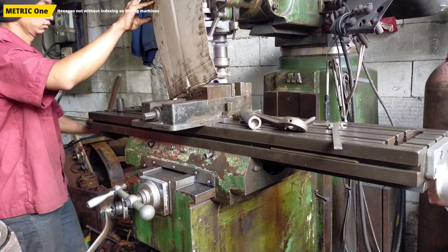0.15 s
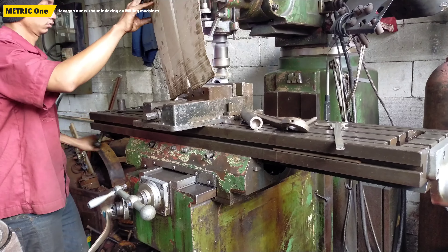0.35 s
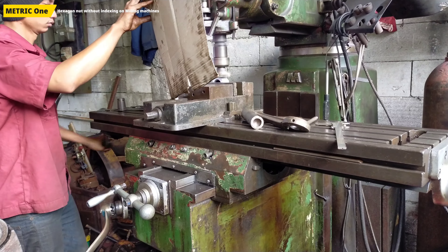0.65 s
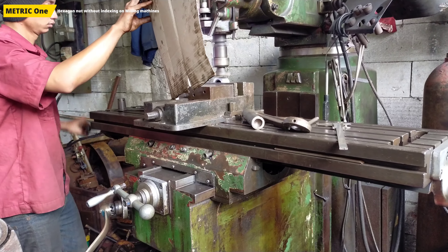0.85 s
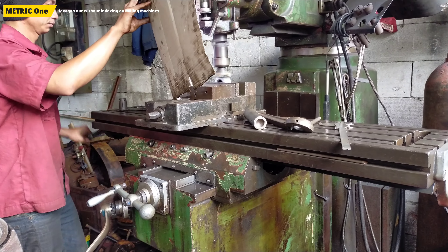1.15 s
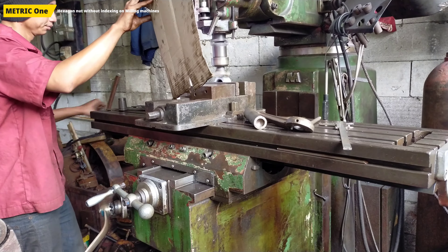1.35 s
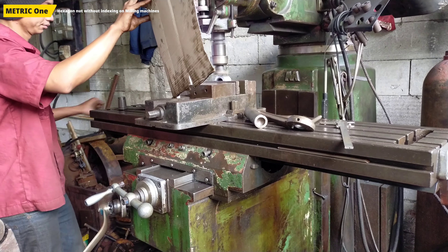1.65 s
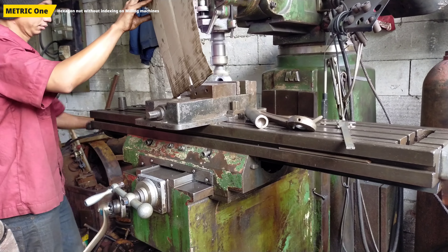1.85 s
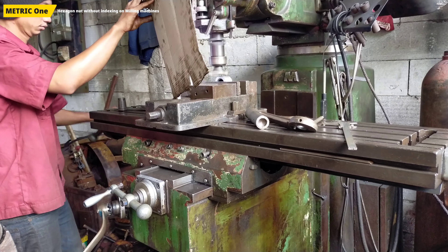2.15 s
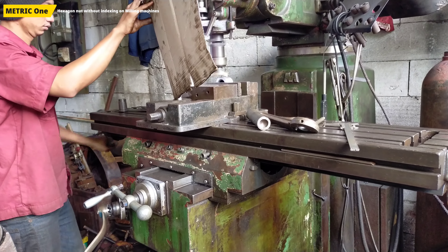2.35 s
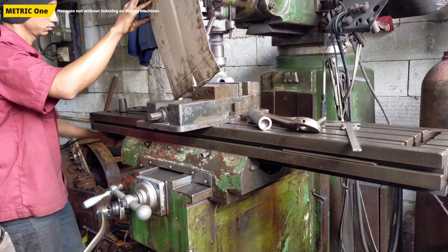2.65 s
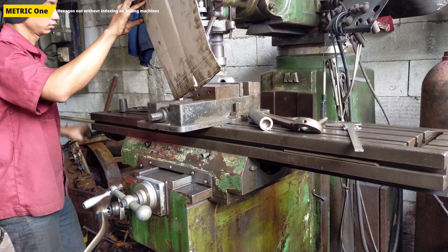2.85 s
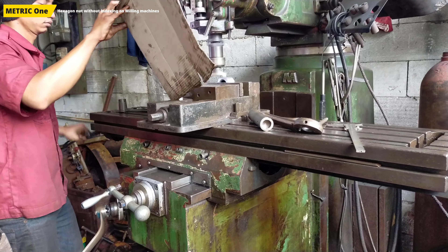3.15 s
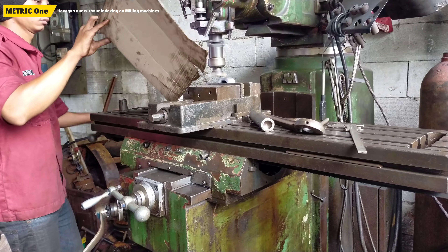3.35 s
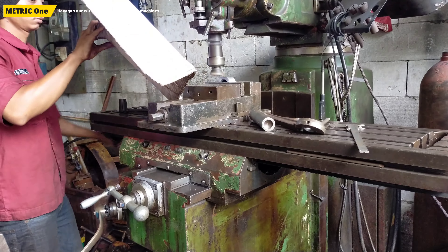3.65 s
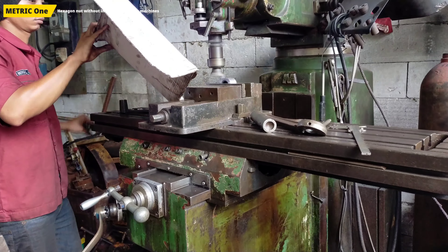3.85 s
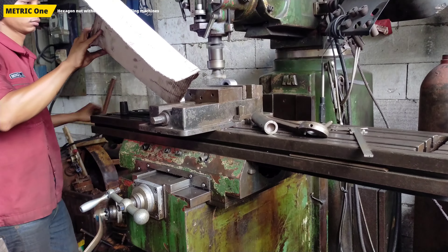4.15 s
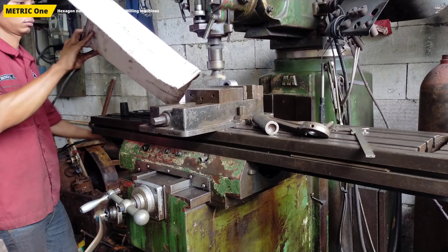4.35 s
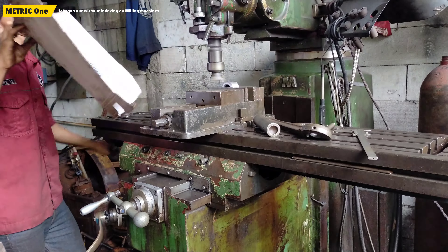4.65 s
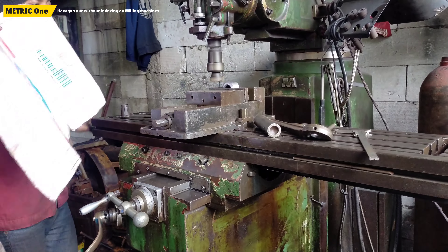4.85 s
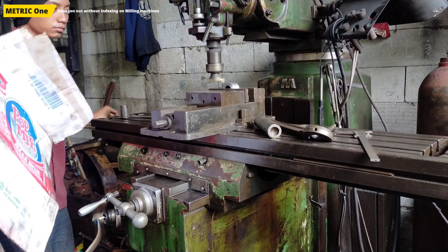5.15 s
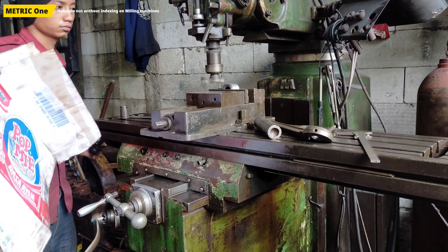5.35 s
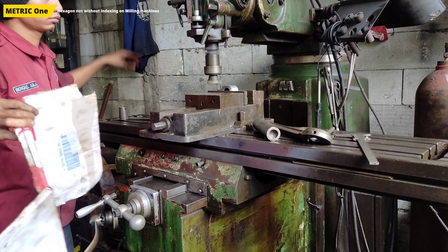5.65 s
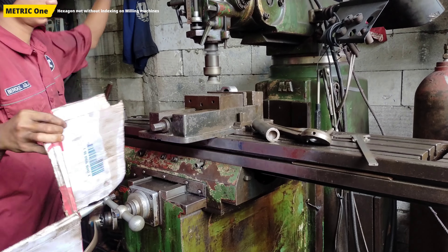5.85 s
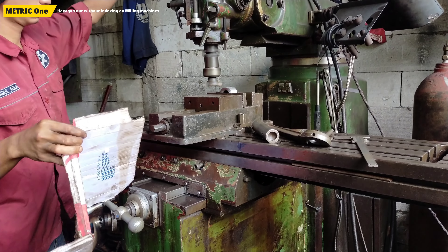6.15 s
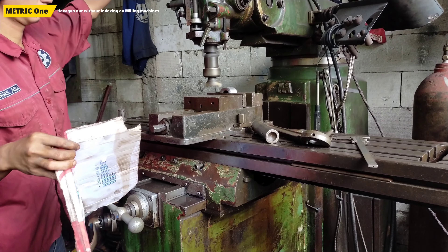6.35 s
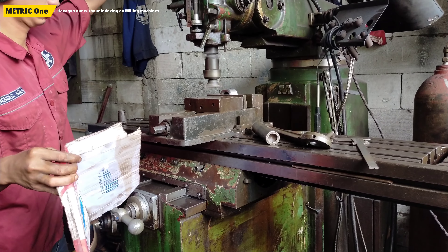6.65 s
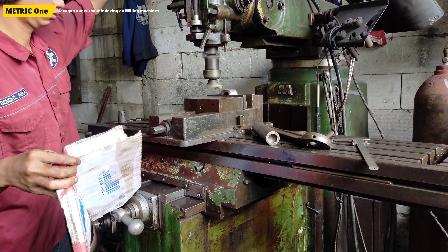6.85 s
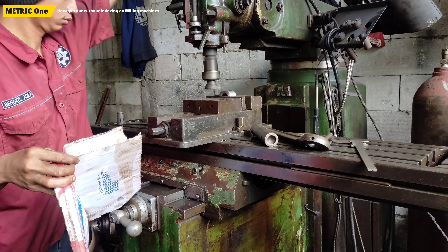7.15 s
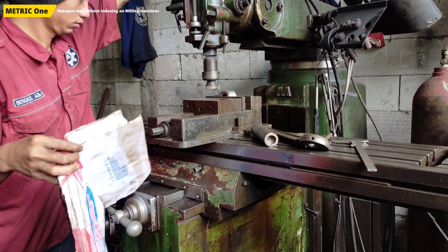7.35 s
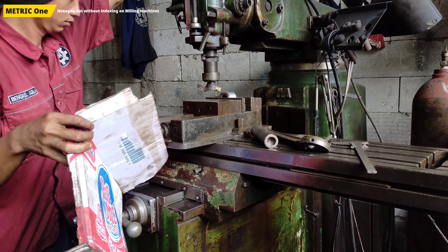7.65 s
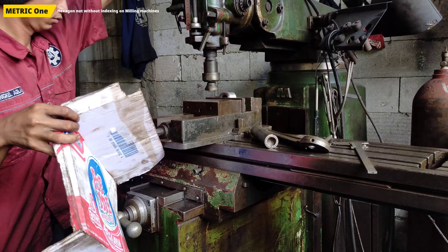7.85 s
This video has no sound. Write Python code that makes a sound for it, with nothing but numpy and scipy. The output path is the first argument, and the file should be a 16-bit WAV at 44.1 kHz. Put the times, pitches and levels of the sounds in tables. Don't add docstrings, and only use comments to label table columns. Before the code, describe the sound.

A milling machine cuts metal in a concrete workshop, close and essentially mono. A scrap of its noise stops almost at once; after silence until about 0.1 s, it fades in over a quarter second from a new spot. Gear hum around 340 Hz swells and cancels over a dense bearing roar, with a steadier whistle near 1.7 kHz. A fluttering motor whine near 6 kHz dips slightly around 1.9 s. Bright chip hiss carries fast tooth chatter, while short metallic rings flicker and slide. A thin squeal near 9.4 kHz creeps in after 2.3 s, peaks at 3.7-4.1 s, sings again at 4.5 s and vanishes by 5.4 s. The motor sags from 4.2 s, lowest and faintest near 5.8 s, then recovers towards 7.8 s. Gain ducks repeatedly, with abrupt dips near 2.9, 4, 5.8 and 7.3 s. Cutting continues to the end.

```python
import sys
import numpy as np
from scipy import signal
from scipy.io import wavfile
from scipy.ndimage import uniform_filter1d, map_coordinates

SR = 44100
rng = np.random.default_rng(int(sys.argv[2]) if len(sys.argv) > 2 else 0)


def level_to_linear(level):
    exponent = np.asarray(level, float) / 20
    return 10 ** exponent


def digitize_waveform(pressure):
    field = np.atleast_2d(pressure).T
    bounded = np.clip(field, -1, 1)
    quanta = np.round(bounded * 32767).astype(np.int16)
    wavfile.write(sys.argv[1], SR, quanta)


N = 352800
T = np.arange(N) / SR
CUT_S, BACK_S, FADE_S = .0345, .1065, .26


def rms_one(x):
    return x / np.sqrt(np.mean(x ** 2) + 1e-20)


def in_time(rows):
    s, *columns = np.transpose(rows)
    return [np.interp(T, s, c) for c in columns]


def bumps(rows, fall_s=None):
    t, out = T[::40], 0
    for s, half, db in rows:
        u = np.where(t < s, (s - t) / (fall_s or half), (t - s) / half)
        out = out + db * np.cos(np.pi / 2 * np.minimum(u, 1)) ** 2
    return np.interp(T, t, out)


def drift(rate):
    r = np.exp(-80 * np.pi * rate / SR)
    noise = rng.standard_normal(N // 40 + 2002)
    slow = signal.lfilter([1], [1, -2 * r, r * r], noise)[2000:]
    return np.interp(T, np.arange(len(slow)) * 40 / SR, rms_one(slow))


def band(x, low_hz, high_hz, order=2):
    return signal.sosfilt(signal.butter(order, [low_hz, high_hz], "band", fs=SR, output="sos"), x)


def coloured(sources, spectrum, patchy_db, rate):
    hz, db = np.transpose(spectrum)
    edges = np.geomspace(hz[0], hz[-1], round(3 * np.log2(hz[-1] / hz[0])))
    out = 0
    for k, (low, high) in enumerate(zip(edges, edges[1:])):
        level_db = np.interp(np.log(low * high) / 2, np.log(hz), db)
        out = out + level_to_linear(level_db + patchy_db * drift(rate)) * band(sources[k % 2], low, high)
    return rms_one(out)


def tone(hz, db, wobble_hz, flutter_db):
    phase = 2 * np.pi * np.cumsum(hz + wobble_hz * drift(28.7)) / SR
    return np.sqrt(2) * level_to_linear(db + flutter_db * drift(26)) * np.sin(phase)


# (time [s], loudness [dB], chip hiss against it [dB])
LOAD = [(.35, -27, -8), (.85, -23.5, -11), (1.2, -27, -7.5), (1.45, -26.5, -9.5), (1.8, -24.5, -8.5),
        (2.3, -24.5, -9), (2.85, -25.5, -8.5), (3.1, -28, -7.5), (3.5, -24.5, -11), (3.95, -24.5, -9.5),
        (4.3, -26, -8), (5.1, -27, -10), (5.7, -30, -7.5), (6.4, -28, -7.5), (6.85, -29.5, -8),
        (7.25, -27, -10.5), (7.8, -25, -8.5), (8, -27.5, -6.5)]
# (deepest time [s], recovery [s], level [dB])
DUCKS = [(.59, 0.046, -2), (.77, 0.1, -2), (.94, 0.25, -2), (1.93, 0.14, -2), (2.2, 0.18, -2),
         (2.75, 0.071, -2.5), (2.84, .05, 1), (3.0, 0.14, 2), (3.33, .06, -2.5), (3.99, 0.44, -1.5),
         (4.22, 0.23, -1), (4.58, 0.039, -1.5), (4.77, .08, -2), (5.25, 0.069, -2), (5.5, 0.059, -2),
         (5.57, 0.038, -3), (5.6, 0.068, 1.5), (5.79, .03, -0.5), (5.9, 0.066, 0.5), (5.975, .04, 0),
         (6.03, 0.11, -2.5), (6.18, 0.1, -2.5), (6.33, 0.13, -2.5), (6.49, 0.12, -3.5), (6.68, 0.09, -1),
         (6.96, 0.14, -1.5), (7.6, .1, -0.5), (7.98, 0.092, -1.5)]
# (time [s], length [s], level [dB])
DROPS = [
    (2.906, 0.16, -3.5),
    (3.968, 0.094, -3),
    (5.838, 0.095, -3),
    (7.31, 0.12, -5),
    (7.945, .1, -1.5),
]


def loudness_db():
    step_s, steps_db = .01, 0
    for s, length, db in DROPS:
        inside_s = np.minimum(T - s, s + length - T)
        steps_db = steps_db + db * np.clip(inside_s / step_s + .5, 0, 1)
    return in_time(LOAD)[0] + bumps(DUCKS, fall_s=0.069) + steps_db


# (frequency [Hz], density [dB per Hz])
BODY = [(15, -54), (25, -10), (139, -19), (232, -3), (335, 1.5), (536, -3.5), (637, -4.5), (724, -1),
        (1350, 1), (1500, -2.5), (1670, 7), (1820, 3), (2110, 2.5), (4200, -18.5), (5460, -77),
        (9240, -120)]
# (frequency [Hz], width [Hz], level [dB])
CASTING = [(97, 20, -52.5), (173, 34, -49), (243.3, 22, -39.5), (629, 38, -39), (802.7, 16, -44.5),
           (858.4, 16, -45.5), (1008, 16, -49.5), (1339, 27, -40.5), (1670, 51, -42), (2030, 47, -57),
           (2077, 17, -43), (2134, 26, -41.5), (2283, 77, -40), (2417, 28, -43)]


def roar():
    sound = coloured(rng.standard_normal((2, N)), BODY, patchy_db=0.5, rate=3.6)
    for hz, width, db in CASTING:
        r = np.exp(-np.pi * width / SR)
        poles = [1, -2 * r * np.cos(2 * np.pi * hz / SR), r * r]
        rung = signal.lfilter([1, 0, -1], poles, rng.standard_normal(N))
        sound += level_to_linear(db + 28 + 1.12 * drift(0.97)) * rms_one(rung)
    rumble_db = -3.5 * np.clip(T - 4.2, 0, 1)
    sound += (level_to_linear(rumble_db) - 1) * band(sound, 126, 224)
    return level_to_linear(loudness_db() - 4.0) * sound


# (time [s], half length [s], level [dB])
BEATS = [(.2, 0.3, -6), (.5, .12, -5), (.84, 0.18, 3), (1.14, 0.12, 2.5), (2.02, 0.12, -13),
         (2.14, 0.083, 4), (2.37, 0.14, -6), (2.54, 0.23, 4.5), (2.85, 0.16, -6), (3.23, .1, -10),
         (3.74, 0.13, 5), (4.05, .2, -1), (4.6, 0.086, -2), (5.2, .1, 3), (5.35, .08, 1),
         (5.52, 0.19, -5.5), (5.68, .08, 3), (5.8, 0.14, -18), (6.1, 0.43, -2.5), (6.47, .06, -11),
         (6.61, 0.1, -20), (6.9, .12, 2), (7.24, 0.27, 4.5), (7.65, 0.25, 3), (7.87, 0.085, 7)]
# (time [s], half length [s], level [dB])
WHISTLE = [(1.1, .2, 1.5), (1.92, .1, -5), (2.3, 0.083, 2), (2.6, 0.18, 2.5), (2.98, 0.14, 1.5),
           (3.2, 0.53, 1.5), (3.8, 0.6, -4), (4.49, 0.13, 2), (4.93, 0.069, 0), (5.68, .12, 2),
           (6.02, 0.15, 4), (6.35, .1, 0), (6.47, .08, -5), (6.68, .12, 1), (6.85, 0.08, -11),
           (7.13, .08, -5), (7.47, .08, 2.5), (7.6, 0.084, -9)]


def gears():
    mesh_hz = 340.2
    loud = loudness_db()
    first_db = loud - 13 + bumps(BEATS)
    fifth_db = loud + 0.17 * (loud - loud.mean())
    fifth_db = fifth_db - 9.5 - 0.36 * T + bumps(WHISTLE)
    fifth_db = fifth_db - 7 * (T < BACK_S)
    return (tone(mesh_hz, first_db, wobble_hz=.4, flutter_db=1.6)
            + tone(5 * mesh_hz, fifth_db + .5, wobble_hz=.5, flutter_db=.8)
            + tone(4 * mesh_hz, fifth_db - 13.0, wobble_hz=2.63, flutter_db=5.5)
            + tone(3 * mesh_hz, fifth_db - 20, wobble_hz=3, flutter_db=4.0))


# (time [s], slot whine [Hz])
SPEED = [(0.3, 6174), (1.1, 6222), (1.5, 6190), (1.87, 5965), (2.15, 6090), (2.5, 6160), (3.2, 6215),
         (3.85, 6225), (4.2, 6095), (5.4, 5365), (5.85, 5225), (6.4, 5295), (6.7, 5390), (7.3, 5860),
         (7.8, 6072), (7.95, 6080)]
# (time [s], half length [s], level [dB])
BREAKS = [(.35, .15, 1), (.6, .06, 6), (.72, .06, -12), (.92, .17, -2), (1.3, .2, 6.5), (1.5, 0.055, -10),
          (1.85, .13, -2), (2.1, .07, 5), (2.3, .37, 4), (2.95, .16, -4), (3.15, .12, 8), (3.39, .089, -12),
          (3.55, .08, 2), (3.72, .22, 7.5), (4.0, .08, 3), (4.35, .15, 1), (4.6, .07, -3), (5, .08, -5),
          (5.45, .12, -4), (5.85, .15, -9), (6.05, .15, -7), (6.5, .1, -4), (6.72, .08, -3), (6.85, .1, -2),
          (7.2, .1, 2), (7.65, 0.28, 5), (8, .15, -4)]
# (time [s], half length [s], level [dB])
OCTAVE_SINGS = [(.2, .1, 4), (.72, .15, 9), (1, .25, 6), (1.5, .1, 10), (1.75, .25, 5), (2.3, .2, 1),
                (2.95, .1, 3), (1.95, .08, 4), (2.75, .12, 7), (3.2, .2, 3), (3.45, .15, 6), (7.2, .2, 7),
                (7.6, .15, 3), (7.9, .15, 4)]


def motor():
    hz = uniform_filter1d(in_time(SPEED)[0], size=SR // 6)
    slowed_khz = (hz.max() - hz) / 1000
    breaks_db = bumps(BREAKS)
    whine_db = hiss_level_db() - 13.5 - 6.5 * slowed_khz + breaks_db
    octave_db = whine_db - 9.5 + .2 * breaks_db + bumps(OCTAVE_SINGS) + 3 + drift(2)
    octave_db = octave_db - np.maximum(5700 - hz, 0) / 40
    stutter_db = (2 + 3 * slowed_khz) * np.minimum(drift(22), .6)
    return (tone(hz, whine_db + .5 + stutter_db, wobble_hz=9, flutter_db=2.5)
            + tone(2 * hz, octave_db, wobble_hz=7, flutter_db=2.5))


# (time [s], level against the loudness [dB])
SQUEAL = [
    (2.3, -27.5),
    (3.3, -16.5),
    (3.55, -23),
    (3.75, -9),
    (4.1, -9),
    (4.25, -14.5),
    (4.5, -9.5),
    (4.66, -16.5),
    (5.1, -24.5),
    (5.401, -23),
]


def squeal():
    db = in_time(SQUEAL)[0]
    hz = 9412 + 2.5 * np.minimum(db.max() - db, 14)
    effort_db = in_time(LOAD)[0]
    db = db + effort_db + 1.5 * (loudness_db() - effort_db)
    on = np.clip(np.minimum(T - SQUEAL[0][0], SQUEAL[-1][0] - T) / 0.41, 0, 1)
    halo = level_to_linear(db - 8) * rms_one(band(rng.standard_normal(N), 9290, 9540))
    return on * (tone(hz, db, wobble_hz=10.5, flutter_db=2.0) + halo)


# (frequency [Hz], density [dB per Hz])
AIR = [(2700, -17), (3200, -10.5), (3950, -10), (5080, -7.5), (6300, -5.5), (6900, -5.5), (8050, -4.5),
       (9500, -0.5), (12000, -6), (13800, 14), (14600, 0), (15400, 1), (17500, -13)]
# (time [s], repeats [per s])
CHATTER = [(0, 136), (1.75, 138), (2.4, 132), (2.9, 132.5), (3.1, 134.5), (4.4, 134), (5.6, 145),
           (5.8, 145), (6.0, 138), (6.4, 137), (8, 139)]
# (time [s], half length [s], level [dB])
LOCKS = [(.25, .3, 3), (.85, .25, 6), (1.7, .4, 6), (2.6, .3, 7), (3.35, .5, 6.5), (4.1, .6, 4),
         (5.65, .45, 5), (6.4, .4, 6), (8, .5, 3)]
# (time [s], half length [s], level [dB])
HOLDER = [(.95, 0.23, 2), (1.75, 0.36, 5), (3.5, .8, 0.5), (4.8, 1, 5), (5.7, 0.65, 2), (6.45, 0.98, 5),
          (7.85, .2, 3)]
# (time [s], half length [s], level [dB])
DULLS = [
    (2.4, .6, -3),
    (5.4, .3, 0),
    (7.35, 0.78, -3.5),
]


def hiss():
    per_s, repeat_db = in_time(CHATTER)[0], -9 + bumps(LOCKS)
    passes = np.cumsum(per_s + .2 * drift(4)) / SR
    pattern = rng.standard_normal((2, 106, 400))
    place = [T * 13, passes % 1 * 399]
    looped = np.array([rms_one(map_coordinates(p, place, order=1)) for p in pattern])
    looped = band(looped, 8200, 11400, order=1) + .5 * band(looped, 6800, 14500, order=3)
    source = rng.standard_normal((2, N)) + looped * level_to_linear(repeat_db + 2)
    source = source / np.sqrt(1 + .6 * level_to_linear(2 * repeat_db))
    sound = coloured(source, AIR, patchy_db=0.7, rate=6.0)
    holder_db = bumps(HOLDER)
    ring = (level_to_linear(holder_db) - 1) * band(sound, 6600, 8180, order=2)
    top_air = (level_to_linear(0.44 * holder_db) - 1) * band(sound, 14200, 17000, order=1)
    sound += ring + top_air
    sound += (level_to_linear(-0.35 * holder_db + bumps(DULLS)) - 1) * band(sound, 12100, 14300, order=1)
    sound += (level_to_linear(2) - 1) * band(sound, 14500, 17000, order=2)
    return level_to_linear(hiss_level_db() + 4.0 + 0.24 * drift(27)) * sound


# (time [s], half length [s], level [dB])
HISS_HOLDS = [
    (5.52, .07, 0.5),
    (5.88, 0.064, 1),
    (7.37, 0.086, 3.5),
]


def hiss_level_db():
    return loudness_db() + in_time(LOAD)[1] + 2.5 * (T < BACK_S) + bumps(HISS_HOLDS)


# (time [s], half length [s], frequency [Hz], level [dB])
FLARES = [(.48, .12, 9500, 4.5), (0.68, .12, 8100, 3), (.65, .35, 12850, 1), (1.26, .12, 9900, 3),
          (1.8, 0.12, 7600, 0.5), (2.37, .2, 7900, 3), (5, .2, 7400, 1.5), (5.1, .15, 10300, 4),
          (6.9, 0.13, 10300, 4.5), (7.75, .2, 10700, 1.5), (7.8, .2, 8000, 0), (7.45, .06, 12750, 2),
          (2.28, 0.22, 550, 6.5), (.45, 0.24, 550, 3), (0.37, 0.16, 1330, 6), (2.75, .2, 1140, 1),
          (.6, 0.17, 2150, -2), (7.6, .3, 2100, 0), (.9, .12, 92, 13), (4.4, 0.098, 160, 8),
          (6.35, .2, 2450, 4.5), (5.35, .15, 2600, 3.5), (6, .4, 14000, 3), (6.3, .3, 11000, 1),
          (7, .12, 9900, -4), (.75, .2, 250, 0), (3.3, .4, 3050, 2), (7.6, .15, 1500, 2),
          (5.65, .15, 1600, 3), (3.05, .2, 170, 7), (6.9, .1, 10000, -6), (4.2, .2, 580, -3),
          (2.55, .12, 163, 7)]


def flared(sound):
    out = sound.copy()
    for s, half, hz, db in FLARES:
        i = slice(max(round((s - half) * SR), 0), round((s + half) * SR))
        swell = np.cos(np.pi / 2 * (T[i] - s) / half) ** 2
        out[i] += (level_to_linear(db * swell) - 1) * band(sound[i], hz * (1 - .065), hz * (1 + .065), order=1)
    return out


# (time [s], length [s], frequency [Hz], level [dB])
PANELS = [(.29, .15, 2200, -39), (1.77, .18, 2410, -37), (1.95, .55, 3185, -45), (2.05, .13, 3545, -45),
          (2.35, .12, 3400, -46), (2.4, .27, 3010, -44), (2.58, .14, 3755, -48), (2.85, .15, 4270, -54),
          (3.06, .22, 3510, -47), (3.25, .2, 4285, -53), (3.45, 1.2, 1312, -42), (3.62, .09, 3740, -47),
          (3.68, .12, 3500, -46), (3.87, .18, 3660, -49), (3.95, .45, 4300, -54), (5.46, .24, 1840, -38),
          (5.5, .27, 2795, -41), (5.62, .55, 2315, -42), (5.9, .4, 2785, -45), (6.08, .1, 3280, -47),
          (6.43, .3, 4385, -55), (6.58, .1, 2400, -41), (7.45, .25, 2100, -39), (7.58, .15, 3710, -51),
          (7.68, .16, 862, -36), (7.8, .12, 2120, -36), (7.82, .14, 4380, -51), (7.87, .13, 3780, -48)]
# (time [s], length [s], frequency [Hz], level [dB])
TOOL = [(.29, .23, 6977, -46), (.42, .14, 9520, -45), (.42, .12, 9700, -44), (.74, .41, 6972, -40),
        (.76, .14, 9701, -45), (.79, .17, 13500, -45), (1.12, .1, 10300, -42), (1.2, .15, 9750, -47),
        (1.23, .29, 6972, -45), (1.51, .14, 11077, -44), (1.54, .28, 10425, -44), (1.6, .21, 10005, -45),
        (1.64, .16, 10884, -43), (2.45, .2, 7518, -44), (2.51, .32, 8274, -44), (2.61, .17, 6976, -47),
        (2.88, .2, 8674, -46), (2.9, .27, 8940, -43), (3.23, .23, 8849, -42), (3.25, .28, 8700, -42),
        (3.35, .27, 6781, -49), (3.43, .21, 13033, -47), (3.43, .2, 9832, -45), (3.51, .13, 11694, -46),
        (4.21, .24, 9749, -44), (4.56, .5, 7877, -47), (4.4, .3, 7250, -47), (4.69, .25, 7260, -43),
        (5.05, .2, 10331, -47), (5.1, .65, 7855, -48), (5.53, .31, 7240, -46), (5.57, .25, 7082, -46),
        (5.69, .13, 11985, -50), (5.95, .47, 7088, -42), (6.1, .24, 9700, -47), (6.38, .33, 9709, -44),
        (6.47, .18, 8065, -47), (6.51, .15, 7106, -45), (6.76, .16, 7180, -44), (6.86, .13, 7249, -48),
        (7.05, .15, 8150, -48)]


def short_rings():
    out, wobble, flutter = np.zeros(N), drift(25), drift(18)
    for k, (s, length, hz, db) in enumerate([*PANELS, *TOOL]):
        i = slice(round(s * SR), round((s + length) * SR))
        u = (T[i] - s) / length
        sag = .02 * (k < len(PANELS)) * u * length
        depth = .004 if hz < 3000 else .0015
        glide = hz * (1 - sag + depth * np.roll(wobble, 9000 * k)[i])
        flutter_db = 2.5 * np.roll(flutter, 9000 * k)[i]
        swell = np.sin(np.pi * np.clip(u, 0, 1)) ** .7 * level_to_linear(db - 2.5 + flutter_db)
        out[i] += np.sqrt(2) * swell * np.sin(2 * np.pi * np.cumsum(glide) / SR)
    return out


# (time [s], length [s], start [Hz], end [Hz], level [dB])
SLIDES = [(2.14, .42, 4310, 4141, -47), (4.12, .3, 2365, 2361, -38), (4.36, .22, 2430, 2426, -32),
          (4.52, .24, 2425, 2366, -37), (4.74, .5, 2370, 2271, -39), (4.95, .2, 6820, 6791, -48),
          (5.25, .42, 6860, 6641, -47), (6.05, .5, 6640, 6721, -48), (6.52, .25, 6720, 6761, -49),
          (3.4, .5, 3070, 3041, -47), (.42, .55, 3230, 3151, -48), (1.0, .3, 3190, 3181, -50),
          (6.1, .75, 3190, 3151, -53), (2.85, .5, 3745, 3726, -50), (7.1, .25, 2700, 2731, -46),
          (4.9, .4, 2760, 2751, -48), (1.5, .5, 1005, 1004, -43), (2.22, .7, 1003, 1004, -41),
          (1.9, .75, 803, 801, -42), (3.4, .5, 858, 856, -43), (1.93, .55, 250, 246, -38),
          (3.6, .35, 245, 253, -38), (5.7, 1, 238, 249, -44), (4.65, .4, 243, 236, -40),
          (.3, .6, 12800, 12880, -45), (.55, .35, 12950, 12720, -46), (.28, .15, 13300, 13290, -46),
          (4.1, .3, 2090, 2140, -39), (2.5, .45, 3150, 3170, -49), (.3, .35, 600, 610, -41),
          (.3, .2, 1250, 1270, -41)]


def slides():
    out, wobble, flutter = np.zeros(N), drift(30), drift(24)
    for k, (s, length, start_hz, end_hz, db) in enumerate(SLIDES):
        i = slice(round(s * SR), round((s + length) * SR))
        u = np.clip((T[i] - s) / length, 0, 1)
        depth = .005 if start_hz < 3000 else .002
        glide = start_hz + (end_hz - start_hz) * u
        glide = glide * (1 + depth * np.roll(wobble, 11000 * k)[i])
        flutter_db = 2.5 * np.roll(flutter, 11000 * k)[i]
        swell = np.sin(np.pi * u) ** .5 * level_to_linear(db - 3 + flutter_db)
        out[i] += np.sqrt(2) * swell * np.sin(2 * np.pi * np.cumsum(glide) / SR)
    return out


def scene():
    noise = flared(roar() + hiss())
    machine = noise + gears() + motor() + squeal() + short_rings()
    mono = machine * level_to_linear(0.47 * drift(27.0)) + slides()
    return np.array([mono, mono])


def band_limit(x):
    return signal.sosfilt(signal.butter(12, 16810, fs=SR, output="sos"), x)


# (time [s], length [s], low [Hz], high [Hz])
BLOTS = [(0.573, 0.038, 8180, 9730), (0.808, 0.041, 13010, 15250), (1.226, 0.041, 10940, 12490),
         (1.353, 0.064, 6200, 7670), (1.944, 0.041, 7490, 9040), (1.99, 0.038, 4130, 5770),
         (1.992, 0.041, 6200, 7670), (2.479, 0.041, 7410, 9130), (2.968, 0.032, 5600, 6980),
         (3.222, 0.041, 7490, 9040), (3.242, 0.035, 4220, 5250), (3.919, 0.041, 6200, 8350),
         (4.684, 0.087, 13700, 15250), (6.03, 0.038, 10940, 12400), (6.032, 0.029, 5170, 6290),
         (6.285, 0.038, 12320, 13870), (7.634, 0.041, 10160, 11800), (7.75, 0.041, 8100, 9730),
         (7.751, 0.038, 6200, 7670)]


def record(dry):
    before = np.where(T < CUT_S, level_to_linear(-1.5), level_to_linear(-38 - 3600 * np.maximum(T - CUT_S, 0)))
    after = np.clip(0.085 + (T - BACK_S) / FADE_S, 0, 1)
    mono = dry[0] * np.where(T < BACK_S, before, after)
    mono = signal.sosfilt(signal.ellip(18, .5, 110, 15490, fs=SR, output="sos"), mono)
    side, white = np.zeros(N), rng.standard_normal(N)
    for s, length, low_hz, high_hz in BLOTS:
        i = slice(round((s - length / 2) * SR), round((s + length / 2) * SR))
        level = level_to_linear(-4.0) * np.std(band(mono[i], low_hz, high_hz, order=4))
        window = signal.windows.tukey(i.stop - i.start, .8)
        side[i] += level * window * rms_one(band(white[i], low_hz, high_hz, order=10))
    return band_limit(np.array([mono + side, mono - side]))


dry = scene()
out = record(dry)
digitize_waveform(out)
```